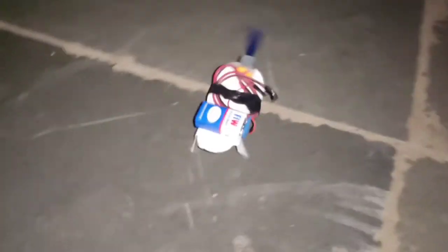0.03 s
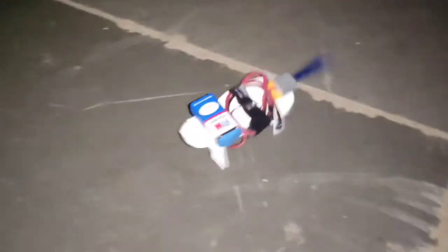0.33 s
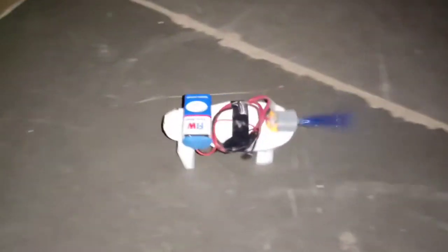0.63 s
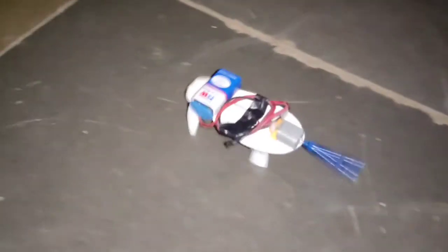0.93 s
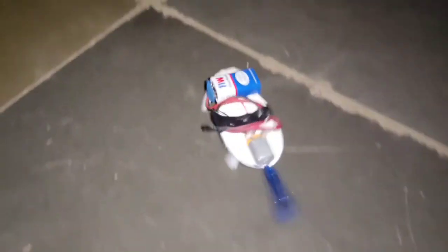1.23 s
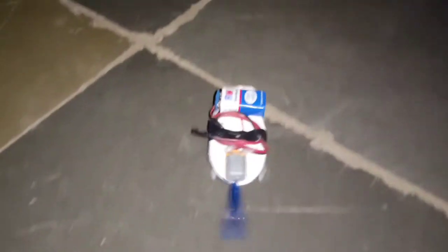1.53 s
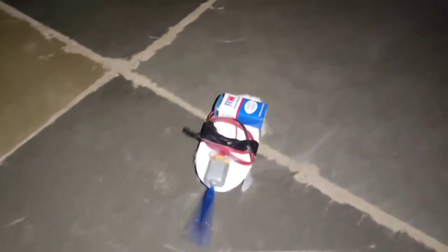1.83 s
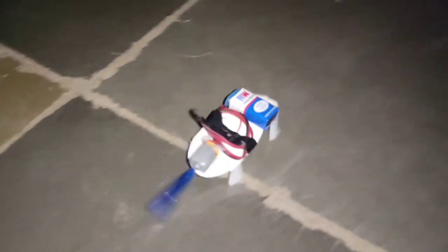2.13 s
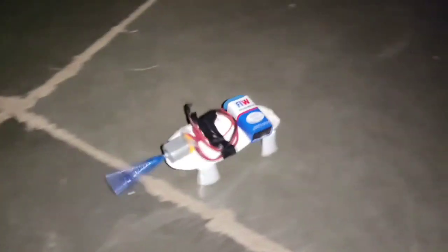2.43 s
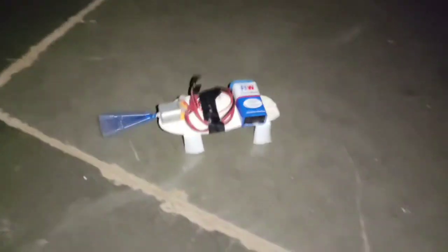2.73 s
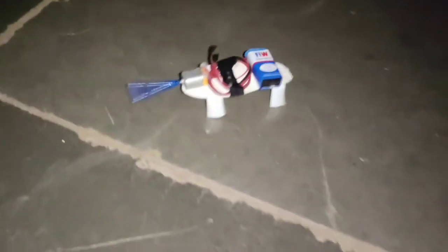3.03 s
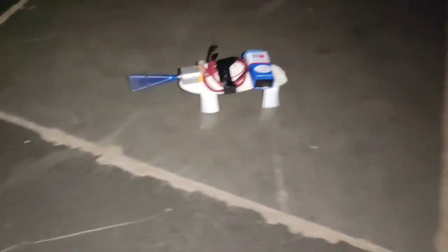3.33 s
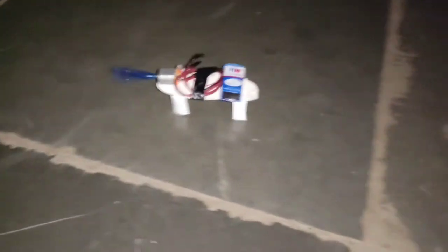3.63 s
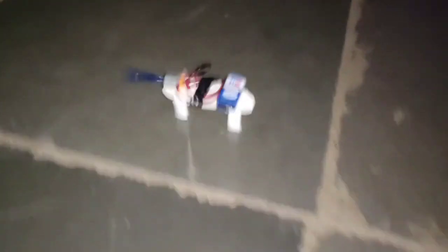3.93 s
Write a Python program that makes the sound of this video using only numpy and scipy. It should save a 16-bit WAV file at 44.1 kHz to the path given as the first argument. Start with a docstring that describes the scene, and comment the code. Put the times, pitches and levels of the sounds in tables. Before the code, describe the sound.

A small homemade robot buzzes and clatters across a tile floor, its plastic feet knocking very rapidly and unevenly. Loose parts tick while the motor whirrs and whistles thinly throughout, in a bare room with a faint low rumble.

```python
"""A fast, buzzing clatter of plastic on tile: a small home-made robot shakes itself across the floor.
Its motor spins an unbalanced blade, and the rotating force drives a foot onto the tile once a turn,
about 56 times a second, now hard, now hardly at all. Each impact rings the plastic body.
Between knocks the other feet chatter and scrape, loose parts tick, and the motor whirrs and whistles.
The bare room reflects the impacts; beneath them lie a rumble, a low drone and soft bumps of handling."""
import sys
import numpy as np
from scipy import signal
from scipy.fft import rfft, irfft, next_fast_len
from scipy.io import wavfile
from scipy.ndimage import map_coordinates

SR = 44100
rng = np.random.default_rng(int(sys.argv[2]) if len(sys.argv) > 2 else 0)


def generate_wav(signal):
    """Clip the signal to [-1, 1] and save it as 16-bit WAV at the path in sys.argv[1]."""
    frames = np.transpose(np.atleast_2d(signal))
    scaled = np.clip(frames, -1, 1) * 32767
    pcm = np.round(scaled).astype(np.int16)
    wavfile.write(sys.argv[1], SR, pcm)


N = 176400
TIME = np.arange(N) / SR

# Spectra of the room's rumble and of a handling bump. Each row: frequency in Hz, gain in dB.
RUMBLE_COLOUR = [(12, -12), (20, 4), (50, 1.5), (75, -9), (97, -12.5), (130, -6), (216, -10.5), (262, -14),
                 (304, -9.5), (380, -16.5), (462, -11.5), (560, -13.5), (700, -10.5), (910, -44),
                 (1540, -120)]
BUMP_COLOUR = [(40, -29), (150, -12), (260, -3.5), (350, -13), (470, -10), (700, -19), (2000, -60)]
# Bumps of handling. Each row: centre in seconds, level in dB, half-width in seconds.
BUMPS = [(0.15, -41, 0.052), (0.62, -48, 0.055), (0.947, -52, .05), (1.455, -45.5, 0.046)]
# Reverberation of the room. Each row: frequency in Hz, time to decay by 60 dB in seconds.
ROOM_T60 = [(200, 0.084), (2500, 0.46), (10000, 0.098)]
# The motor's whistle. Each row: time in seconds, frequency in Hz, level in dB.
WHISTLE = [(0, 7980, -41), (1.2, 7820, -41), (2.198, 7950, -39), (2.5, 7500, -51), (2.948, 7200, -35),
           (3.3, 7250, -43), (3.78, 7160, -36.5), (4, 7170, -48)]
# Envelopes of motor hiss, scraping and light taps. Each row: time in seconds, level in dB.
WHIRR_LEVEL = [(0.0, -33.5), (0.28, -35), (2.45, -32), (2.52, -28), (2.82, -31.5), (2.87, -49),
               (2.88, -31.5), (3.85, -31), (3.94, -34), (4.0, -28.5)]
SCRAPE_LEVEL = [(0.0, -29), (0.32, -29.5), (0.4, -29), (0.44, -26), (0.69, -33.5), (0.71, -29),
                (0.77, -36.5), (0.91, -28), (2.46, -35.5), (2.71, -36), (3.14, -31.5), (3.32, -36),
                (3.39, -30.5), (3.6, -36), (3.89, -33.5), (3.92, -36), (4.0, -33)]
CHATTER_LEVEL = [(0, -33.5), (.3, -31), (1, -32), (1.4, -32), (2.1, -33), (2.8, -35), (3.2, -33),
                 (4, -35.5)]
# Spectra of motor hiss, scraping, a light tap and a tick. Each row: frequency in Hz, gain in dB.
WHIRR_COLOUR = [(300, -23), (800, -20.5), (1200, -6.5), (2500, 4.5), (4000, -15), (6000, -6), (6700, -5),
                (7250, 0.5), (7900, 1.5), (9000, -0.5), (9650, -15), (10600, -20.5), (11200, -29),
                (15500, -26)]
SCRAPE_COLOUR = [(500, -23.5), (1200, -6.5), (2500, 1.5), (3600, -0.5), (4700, -0.5), (5700, -3),
                 (6500, -6), (9000, -5), (10000, -21.5), (16000, -34)]
TAP_COLOUR = [(100, -31.5), (600, -28), (820, -19), (1080, -7), (1450, -10.5), (1900, -5.5), (2480, -3.5),
              (2800, -11), (3200, -7), (4500, -18.5), (8500, -18), (10000, -36), (16000, -58)]
TICK_COLOUR = [(200, -32), (900, -22), (2000, 0), (3100, 1), (3600, 5.5), (4800, 2.5), (6000, 2),
               (7000, 1.5), (8000, 4.5), (9200, 2.5), (9700, -19), (10600, -15), (11300, -21), (15500, -28)]
# Sharp ticks of loose parts. Each row: start in seconds, relative level in dB, ring frequency in Hz.
SHARP_TICKS = [(.0996, -13, 3570), (.1519, -16, 6200), (.2038, -13, 6200), (.2275, -18, 6000),
               (.2443, -14, 3450), (.2796, -16, 4300), (.2973, -17, 5400), (.3316, -13, 3590),
               (.3671, -15, 5000), (.4376, -12, 3520), (.4559, -17, 3390), (.489, -16, 7800),
               (.5107, -18, 3710), (.5804, -13, 5900), (.6047, -16, 7900), (.7102, -14, 3540),
               (.8146, -16, 8000), (.9073, -15, 7700), (.977, -14, 5180), (1.0852, -15, 3960),
               (1.1538, -17, 4970), (1.1776, -16, 3610), (1.2328, -16, 7900), (1.2825, -15, 3400),
               (1.2859, -14, 8000), (1.3328, -16, 4400), (1.3513, -15, 3580), (1.4228, -16, 4900),
               (1.5487, -15, 3630), (1.6007, -11, 3910), (1.7286, -15, 3520), (1.8508, -13, 3520),
               (1.9595, -15, 3700), (1.992, -17, 3900), (2.1398, -17, 7850), (2.1775, -16, 7900),
               (2.4823, -15, 6300), (2.5345, -9, 6200), (2.539, -12, 7400), (2.6423, -14, 7500),
               (2.7171, -16, 7300), (2.8216, -13, 6000), (2.9664, -15, 7200), (3.0373, -15, 4190),
               (3.0721, -13, 3700), (3.1792, -14, 3700), (3.4448, -15, 7400), (3.7515, -15, 7200),
               (3.7826, -15, 7200), (3.8006, -15, 7200), (3.8346, -16, 7300), (3.8542, -16, 5300),
               (3.9802, -14, 4500)]
# Moments when the robot is off the ground. Each row: centre in seconds, level change in dB.
AIRBORNE = [(0.537, -9), (1.755, -3), (2.076, -2.5), (2.436, -1), (2.868, -4), (3.699, -2), (3.924, -5)]
# Rotation of the motor. Each row: time in seconds, speed in turns per second.
MOTOR_SPEED = [(0.0, 55.96), (0.3, 56.35), (0.65, 55.55), (0.85, 56.6), (1.05, 56.11), (1.2, 54.04),
               (1.38, 57.26), (1.55, 55.49), (1.68, 56.79), (1.78, 55.54), (1.92, 56.89), (2.1, 55.04),
               (2.35, 55.72), (2.48, 54.32), (2.7, 55.87), (3.15, 56.01), (3.55, 56.59), (4.0, 55.71)]
# Strength of an ordinary knock. Each row: time in seconds, level in dB.
HOP_LEVEL = [(0, -8.8), (.7, -7), (1.1, -8.5), (1.6, -8.2), (2.3, -9.8), (2.8, -12.3), (3.1, -10),
             (3.5, -12.5), (4, -14)]
# Turns on which the foot barely touches. Each row: time in seconds, level change in dB.
SKIPS = [(.088, -5), (.229, -13), (.265, -7), (.336, -8), (.389, -9), (.407, -9), (.46, -7), (.496, -18),
         (.514, -8), (.532, -28), (.586, -15), (.711, -13), (.889, -5), (.942, -7), (1.085, -7),
         (1.157, -10), (1.391, -7), (1.409, -6), (1.427, -12), (1.497, -6), (1.711, -10), (1.729, -16),
         (1.747, -27), (1.855, -5), (1.996, -8), (2.068, -14), (2.124, -6), (2.176, -19), (2.249, -9),
         (2.357, -8), (2.429, -15), (2.484, -8), (2.594, -8), (2.666, -8), (2.702, -7), (2.719, -9),
         (2.863, -14), (2.934, -16), (3.04, -7), (3.071, -8), (3.149, -8), (3.256, -8), (3.291, -7),
         (3.469, -7), (3.54, -7), (3.575, -9), (3.646, -9), (3.806, -5), (3.859, -18), (3.931, -8),
         (3.985, -6)]
# Hard landings. Each row: start in seconds, level in dB.
LANDINGS = [(.1215, -8), (.1933, -8), (.2122, -8), (.2466, -4.5), (.2998, -7), (.3535, -7), (.4249, -5.5),
            (.4442, -7.5), (.478, -6.5), (.5494, -5.5), (.5688, -8.5), (.6026, -6), (.6392, -7.5),
            (.7839, -6.5), (.8713, -6), (.9242, -7.5), (.9947, -5.5), (1.066, -8), (1.1758, -7),
            (1.231, -8.5), (1.2488, -9), (1.3015, -7), (1.3718, -7), (1.444, -7), (1.5162, -8),
            (1.7667, -11.5), (1.7851, -8.5), (1.9079, -9.5), (1.9595, -7.5), (2.0131, -7), (2.0864, -7.5),
            (2.1587, -8), (2.2307, -9), (2.267, -8.5), (2.3929, -10.5), (2.4476, -9.5), (2.5568, -10.5),
            (2.5768, -8.5), (2.6831, -10.5), (2.8817, -8.5), (3.1296, -10.5), (3.2376, -11.5),
            (3.6632, -12), (3.7695, -12.5), (3.9489, -13.5)]
# Resonance of the plastic body. Each row: frequency in Hz, gain in dB.
BODY_COLOUR = [(100, -46), (600, -40), (820, -34), (1080, -13), (1450, -12), (1900, -5.5), (2250, 1),
               (2480, 4), (2750, 0), (3150, -8.5), (4000, -23), (6500, -46), (8500, -22), (10000, -60),
               (16000, -61)]
# Phase difference between the channels. Each row: frequency in Hz, lead of the left in radians.
LEFT_LEAD = [(100, 2), (1200, -0.5), (2500, -0.27), (3200, -2), (4200, -2), (5500, -3), (7500, -3.5),
             (15000, -6.5)]
# Imbalance of the two microphone ports. Each row: frequency in Hz, left minus right in dB.
PORT_BALANCE = [(60, 4), (87, 12), (130, -2), (180, 4.5), (260, 4.5), (380, 3.5), (550, 1.5), (790, 1.0),
                (1140, 1), (1650, 1), (2380, 0.5), (3440, 1.5), (4970, 2), (7180, -5), (10400, 4),
                (15000, -4)]

RATTLE_TURN = .98  # point in each turn where ticks gather and hiss and scraping swell


def amp(db):
    """Amplitude grows tenfold for every 20 dB."""
    return 10 ** (np.asarray(db) / 20)


def unit(x):
    """Normalisation to an rms of 1."""
    return x / np.sqrt(np.mean(x ** 2) + 1e-20)


def along(points, hz):
    """Interpolation of (Hz, value) points on a logarithmic frequency axis."""
    knot_hz, values = np.transpose(points)
    return np.interp(np.log(hz + 1), np.log(knot_hz + 1), values)


def curve(rows, t=TIME):
    """Linear interpolation of (seconds, value) points at times t."""
    return np.interp(t, *np.transpose(rows))


def wobble(rate):
    """Smooth random fluctuation: a spline through `rate` knots a second."""
    return map_coordinates(rng.standard_normal(int(N * rate / SR) + 4), [TIME * rate])


def filtered(x, response):
    """Linear filtering: the spectrum of x is multiplied by a frequency response."""
    size = next_fast_len(N + SR // 2)
    return irfft(rfft(x, size) * response(np.fft.rfftfreq(size, 1 / SR)), size)[..., :N]


def stereo_white(shape, coherence):
    """Partial coherence: left and right each mix a shared white noise with one of their own."""
    white = rng.standard_normal((3, *shape))
    return np.sqrt(coherence) * white[0] + np.sqrt(1 - coherence) * white[1:]


def noise(colour, coherence):
    """Spectral shaping turns white noise into coloured stereo noise of rms 1."""
    return unit(filtered(stereo_white((N,), coherence), lambda hz: amp(along(colour, hz))))


def place(times, db, shapes):
    """Superposition of one short waveform per event, each at its time and level."""
    starts = np.round(np.clip(times, 0, None) * SR).astype(int)
    samples = starts[:, None] + np.arange(shapes.shape[1])
    return np.bincount(samples.ravel(), (shapes * amp(db)[:, None]).ravel(), N)[:N]


def impacts(times, db, grit, t60_s):
    """Impact excitation: each blow is an impulse followed by a decaying random scuff."""
    t = np.arange(SR // 50) / SR
    blows = grit * rng.standard_normal((len(times), len(t))) * amp(-60 * t / t60_s)
    blows[:, 0] = 1
    return place(times, db, blows)


def resonate(force, colour, snap, size=4096):
    """Resonance by convolution: snap 1 gives an abrupt minimum-phase attack, 0 a symmetric swell."""
    gain = amp(along(colour, np.fft.rfftfreq(size, 1 / SR)))
    cepstrum = irfft(np.log(gain))
    cepstrum[1:size // 2] *= 2  # folding onto positive time gives minimum phase
    cepstrum[size // 2 + 1:] = 0
    log_spectrum = rfft(cepstrum)
    response = np.fft.fftshift(irfft(np.exp(log_spectrum.real + 1j * snap * log_spectrum.imag)))
    response /= np.abs(response).max()
    return signal.fftconvolve(force, response)[size // 2:size // 2 + N]


def background():
    """Low-frequency ambient sound: a wavering 45.6 Hz drone, room rumble and bumps of handling."""
    drone = amp(-55.5 + 2.5 * wobble(2)) * np.sin(2 * np.pi * 45.6 * TIME + wobble(9.8))
    rumble = amp(-49) * noise(RUMBLE_COLOUR, coherence=.76)
    bumps = sum(amp(db) * np.exp(-((TIME - s) / width) ** 2) for s, db, width in BUMPS)
    return rumble + drone + bumps * noise(BUMP_COLOUR, coherence=.89)


def reverberation(x, positions=8):
    """Diffuse reflections decay exponentially; one tail fades into the next as the robot moves."""
    wet = np.zeros((2, N))
    for share in np.eye(positions):
        hz, t, spectra = signal.stft(stereo_white((SR // 2,), coherence=.17), SR, nperseg=256)
        decay = amp(-60 * t / along(ROOM_T60, hz)[:, None])
        _, tail = signal.istft(spectra * decay, SR, nperseg=256)
        crossfade = np.sqrt(np.interp(TIME, np.linspace(0, N / SR, positions), share))
        wet += signal.fftconvolve(x * crossfade, tail / np.linalg.norm(tail[0]), axes=1)[:, :N]
    return wet


def motor_whistle(width_hz=690):
    """Random modulation broadens the motor's drifting tone into a thin, fuzzy band."""
    s, hz, db = np.transpose(WHISTLE)
    phase = 2 * np.pi * np.cumsum(np.interp(TIME, s, hz)) / SR
    band = [wobble(width_hz) * np.sin(phase) + wobble(width_hz) * np.cos(phase) for _ in range(2)]
    return amp(np.interp(TIME, s, db)) * unit(np.array(band))


def whirr_and_scrape(turns, roughness_hz=300):
    """Amplitude modulation: motor hiss and the feet's friction noise flutter and swell once a turn."""
    swell = np.cos(2 * np.pi * (turns - RATTLE_TURN))
    whirr_db = curve(WHIRR_LEVEL) + 1.4 * swell + 2.25 * wobble(roughness_hz)
    scrape_db = curve(SCRAPE_LEVEL) + .5 * swell + 3.5 * wobble(roughness_hz)
    whirr = amp(whirr_db) * noise(WHIRR_COLOUR, coherence=.063)
    scrape = amp(scrape_db) * noise(SCRAPE_COLOUR, coherence=.36)
    return whirr + scrape


def ticks(times, db, hz, crack_t60_s=.007, ring_t60_s=.014):
    """Damped free vibration: a struck part gives a crack of noise and rings at its own pitch."""
    t = np.arange(1320) / SR
    cracks = stereo_white((len(times), len(t)), coherence=.25) * amp(-60 * t / crack_t60_s)
    phase = 2 * np.pi * rng.random((2, len(times), 1))
    rings = .42 * np.sin(2 * np.pi * hz[:, None] * t + phase) * amp(-60 * t / ring_t60_s)
    stereo = np.array([place(times, db, channel) for channel in cracks + rings])
    return filtered(stereo, lambda f: amp(along(TICK_COLOUR, f)))


def rattle(turns, per_turn=2, spread_turns=.08, scatter_db=3.5):
    """Forced vibration makes loose parts tick near the same point of each turn; a few stand out."""
    sharp_times, sharp_db, sharp_hz = np.transpose(SHARP_TICKS)
    turn = np.repeat(np.arange(int(turns[-1])), per_turn)
    timing, strength, detune = rng.standard_normal((len(turn), 3)).T
    times = np.interp(turn + RATTLE_TURN + spread_turns * timing, turns, TIME)
    hz = rng.choice(sharp_hz, len(turn)) * (1 + .05 * detune)
    light_ticks = unit(ticks(times, scatter_db * np.minimum(strength, 1), hz))
    return amp(-36.5) * light_ticks + ticks(sharp_times, sharp_db, sharp_hz)


def chatter(turns, taps_per_s=520, scatter_db=3.5, swing_db=2, cluster_db=1.3):
    """Random impacts: the other feet tap lightly, in uneven clusters, hardest around each knock."""
    times = rng.uniform(0, N / SR, int(taps_per_s * N / SR))
    tap_db = scatter_db * np.minimum(rng.standard_normal(len(times)), 1)
    envelope_db = curve(CHATTER_LEVEL) + swing_db * np.cos(2 * np.pi * turns) + cluster_db * wobble(22)
    force = impacts(times, tap_db, grit=.1, t60_s=.0043)
    return amp(envelope_db) * unit(resonate(force, TAP_COLOUR, snap=1))


def knocks(turns, scatter_db=1.1, jitter_s=.0003, body_shift=.035):
    """Rotating unbalance drives one foot onto the tile once a turn; each blow rings the body."""
    times = np.interp(np.arange(int(turns[-1]) + 1), turns, TIME)
    strength, timing, stance = rng.standard_normal((len(times), 3)).T
    db = curve(HOP_LEVEL, times) + scatter_db * strength
    times += jitter_s * timing
    for s, change_db in SKIPS:
        db[np.argmin(abs(times - s))] += change_db
    for s, landing_db in LANDINGS:
        nearest = np.argmin(abs(times - s))
        times[nearest], db[nearest] = s, landing_db
    stance = np.clip(np.round(stance), -1, 1)
    sound = np.zeros(N)
    for step in (-1, 0, 1):  # the body rings lower or higher depending on how the foot lands
        force = impacts(times[stance == step], db[stance == step], grit=.04, t60_s=.01)
        colour = np.multiply(BODY_COLOUR, [1 + step * body_shift, 1])
        sound += resonate(force, colour, snap=.376)
    return sound


def scene(first_knock_s=.0151, airborne_s=.01):
    """Superposition of robot and room; a phase difference sets the robot a little to the right."""
    turns = np.cumsum(curve(MOTOR_SPEED)) / SR
    turns -= np.interp(first_knock_s, TIME, turns)
    # off the ground, all the robot's sounds but the knocks dip briefly
    dips = amp(sum(db * np.exp(-((TIME - s) / airborne_s) ** 2) for s, db in AIRBORNE))
    clatter = knocks(turns) + dips * (chatter(turns) + rattle(turns))
    reflections = amp(-11) * reverberation(clatter)
    hiss = dips * (whirr_and_scrape(turns) + motor_whistle())
    robot = filtered(clatter + reflections + hiss,
                     lambda hz: np.exp(.5j * np.outer([1, -1], along(LEFT_LEAD, hz))))
    return robot + background()


def record(dry):
    """Frequency response: each microphone port has its own colour, band-limited to 15.8 kHz."""
    return filtered(dry, lambda hz: amp(np.outer([.5, -.5], along(PORT_BALANCE, hz))) * (hz < 15800))


dry = scene()
out = record(dry)
generate_wav(out)
```